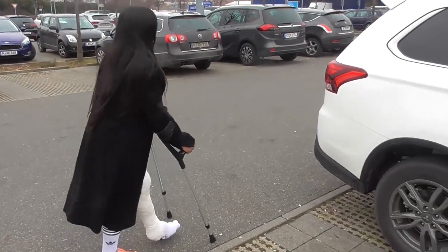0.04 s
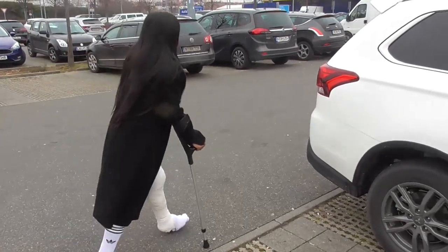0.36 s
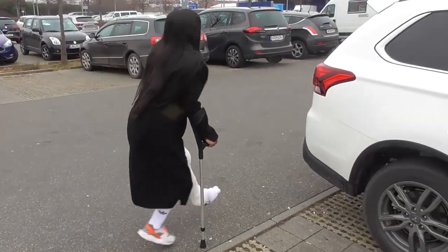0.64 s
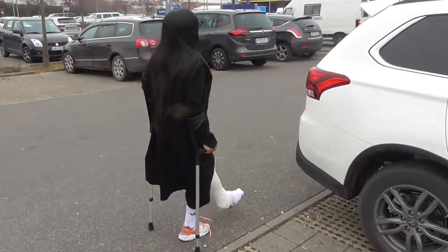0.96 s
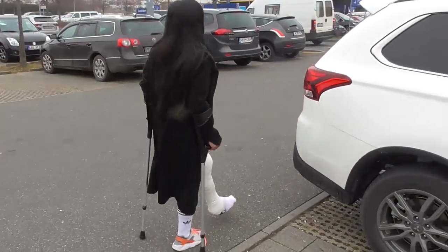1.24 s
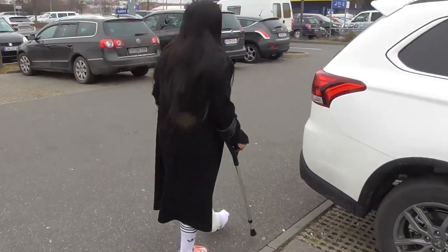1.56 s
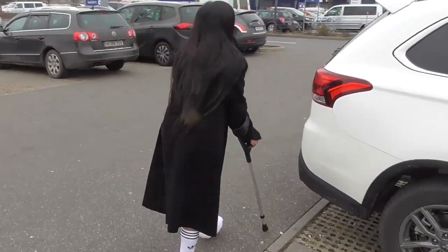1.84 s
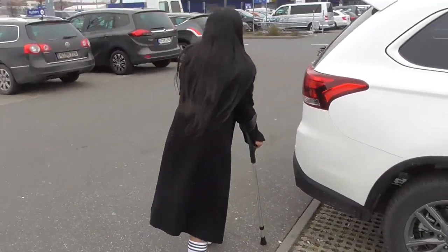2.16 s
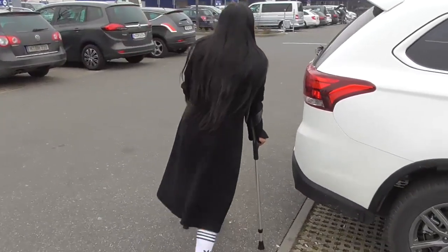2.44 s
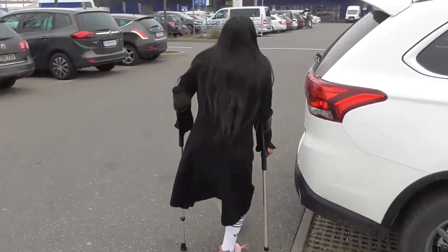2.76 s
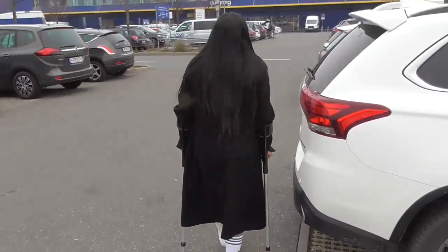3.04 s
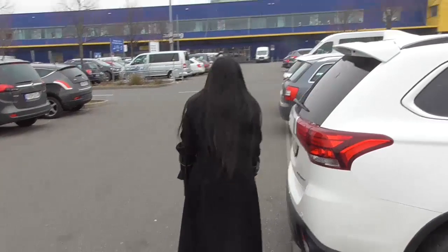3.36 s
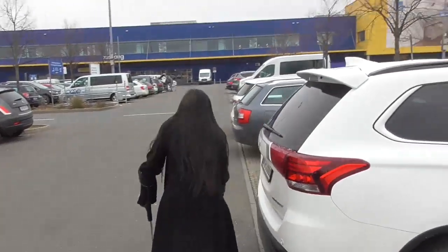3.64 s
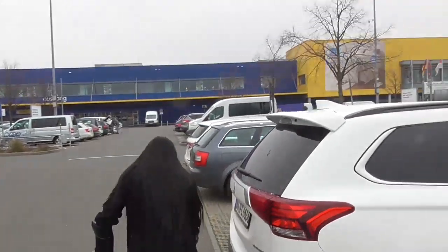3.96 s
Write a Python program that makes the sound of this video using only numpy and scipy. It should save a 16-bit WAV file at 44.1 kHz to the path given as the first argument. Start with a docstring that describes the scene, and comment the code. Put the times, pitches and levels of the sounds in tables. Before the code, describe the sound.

Crutches clack and tap on asphalt with single footsteps, over distant traffic and wind gusts.

```python
"""An open asphalt car park: someone on crutches crosses close to the microphone.
A crutch tube clacks and rings, tips and joints tick, rubber tips thud, a coat swishes.
The one shoe lands with a heel slap, a forefoot clap and a crunch of grit.
Distant traffic rumbles, an engine idles, and in the second half wind buffets the microphone."""
import sys
import numpy as np
from scipy import signal
from scipy.fft import rfft, irfft
from scipy.io import wavfile
from scipy.ndimage import uniform_filter1d

SR = 44100
rng = np.random.default_rng(int(sys.argv[2]) if len(sys.argv) > 2 else 0)


def wav_out(sig):
    """Save sig, one row per channel (or a flat mono array), as 16-bit PCM at SR to the path in sys.argv[1]."""
    wavfile.write(sys.argv[1], SR, np.round(np.clip(np.atleast_2d(sig).T, -1, 1) * 32767).astype(np.int16))


N = 176400

# Hiss spectrum of grit and coat. Each row: frequency in Hz, relative level in dB.
HISS_SPECTRUM = [(1000, -16), (3500, -7.5), (5600, -7), (7300, 0.5), (9000, 1.5), (11500, 2), (13500, -7.5),
                 (16000, -17)]


def undb(db):
    """Decibels to gain."""
    return 10 ** (np.asarray(db) / 20)


def unit(x):
    """Scale to rms 1."""
    return x / np.sqrt(np.mean(x ** 2))


def envelope(t, points):
    """Gain over time from (s, dB) points."""
    return undb(np.interp(t, *np.array(points).T))


def gains(points):
    """Gain per FFT bin from (Hz, dB) points."""
    hz, db = np.array(points, float).T
    bin_hz = np.arange(N // 2 + 1) * SR / N
    return undb(np.interp(np.log(bin_hz + 1), np.log(hz), db))


def colour(x, points):
    """Minimum-phase filter through (Hz, dB) points; keeps the power of white noise."""
    cepstrum = irfft(np.log(unit(gains(points))), N)
    cepstrum[1:N // 2] *= 2
    cepstrum[N // 2 + 1:] = 0
    impulse = irfft(np.exp(rfft(cepstrum)), N)[:N // 20]
    return signal.fftconvolve(x, impulse)[:N]


def band(x, hz, width_hz):
    """One resonance."""
    return signal.lfilter(*signal.iirpeak(hz, hz / width_hz, fs=SR), x)


def noise():
    """White noise."""
    return rng.standard_normal(N)


def wander(rate_hz):
    """Smooth random curve, rms 1."""
    hold = int(SR / rate_hz)
    stairs = np.repeat(noise()[:N // hold + 1], hold)
    return unit(uniform_filter1d(uniform_filter1d(stairs, hold), hold)[:N])


def fade(age_s, decay_s):
    """Sudden start, exponential decay."""
    return (age_s >= 0) * np.exp(-np.maximum(age_s, 0) / decay_s)


def fade_t60(age_s, t60_s):
    """Sudden start, 60 dB down after t60_s."""
    return fade(age_s, t60_s / np.log(1000))


def blow(start_s, modes, pitch_ratio=1, contact_s=0.0003):
    """One impact rings damped (Hz, dB, T60 s) modes at random phases."""
    out, first = np.zeros(N), int(start_s * SR)
    age_s = np.arange(min(SR // 4, N - first)) / SR
    ring = 0
    for hz, db, t60_s in modes:
        phase = 2 * np.pi * (hz * pitch_ratio * age_s + rng.random())
        ring += undb(db) * fade_t60(age_s, t60_s) * np.sin(phase)
    out[first:first + len(age_s)] = ring * (1 - np.exp(-age_s / contact_s))
    return out


def traffic(t):
    """Far roads rumble and swell, in stereo."""
    # Each row: frequency in Hz, relative level in dB.
    spectrum = [(25, -21.5), (45, -6), (65, 4.5), (90, -5), (140, -4), (260, -1.5), (380, -9), (500, -12),
                (750, -10), (1200, -16.5), (1700, -27), (2500, -35.5), (5500, -39), (9500, -38),
                (12500, -40), (16000, -51.5)]
    # Each row: frequency in Hz, side-to-mid ratio in dB.
    width = [(60, -8), (110, -14.5), (200, -27), (380, -9), (700, -9.5), (1290, -5.5), (2380, -4.5),
             (4400, -4.5), (8120, -2.5), (15000, -2)]
    # Each row: time in seconds, level in dB.
    levels = [(0, -42), (.4, -41.5), (1.1, -43), (1.9, -43), (2.5, -42.5), (4, -41.5)]
    mid, side = (colour(noise(), spectrum) * undb(0.39 * wander(6.17)) for _ in range(2))
    side = irfft(rfft(side) * gains(width), N)
    return np.array([mid + side, mid - side]) * envelope(t, levels)


def idling_engine(hz=64.66, wobble_hz=1.83, level_db=-52):
    """An engine idles: one low tone, unsteady in pitch and level."""
    phase = 2 * np.pi * np.cumsum(hz + wobble_hz * wander(9.08)) / SR
    return undb(level_db) * unit(np.sin(phase) * undb(2 * wander(5.16)))


def far_car(t, hz=238.5, width_hz=89):
    """A far car hums in a narrow band of noise."""
    # Each row: time in seconds, level in dB.
    levels = [(0, -57), (.38, -42), (.7, -49), (1.4, -54), (1.8, -52), (2.5, -57), (4, -65)]
    hum = band(band(noise(), hz, width_hz), hz, 2 * width_hz)
    return unit(hum) * envelope(t, levels)


def shimmer(t, flicker_db=5, drift_ratio=0.015, fade_s=0.13):
    """Faint, thin bands of high hiss flicker and drift in pitch."""
    # Each row: centre in Hz, width in Hz, level in dB, start and end in seconds.
    hiss_bands = [(11320, 620, -69.5, 0.13, 2.34), (7300, 300, -70.5, .18, 0.47),
                  (4670, 500, -73.5, 0.083, 0.69)]
    out = 0
    for hz, width_hz, db, start_s, end_s in hiss_bands:
        gate = np.clip(np.minimum(t - start_s, end_s - t) / fade_s + 0.5, 0, 1)
        level = undb(db + flicker_db * wander(70)) * gate
        phase = 2 * np.pi * np.cumsum(hz * (1 + drift_ratio * wander(30))) / SR
        hiss = [wander(2 * width_hz) * np.sin(phase) + wander(2 * width_hz) * np.cos(phase)
                for _ in range(2)]
        out += level * np.array(hiss)
    return out


def tube_clacks(t, ring_db=-0.5, crack_db=1):
    """The telescopic crutch tube takes up its play in quick knocks and rings."""
    # Each row: start in seconds, level in dB.
    knocks = [(.6487, -29), (.6512, -24.5), (0.6525, -26.5)]
    # Each row: frequency in Hz, relative level in dB, T60 in seconds.
    tube_modes = [(7220, -18, 0.15), (7330, -22, 0.17), (7400, -20.5, 0.15), (7530, 5, 0.016),
                  (8040, 1.5, 0.018), (8400, -2, 0.012), (8900, -10, 0.0099)]
    # Each row: frequency in Hz, relative level in dB.
    crack_spectrum = [(700, -29), (1600, -5), (2300, -5), (3000, -5.5), (4200, 4), (5800, -8), (8000, 4.5),
                      (12500, -3), (16000, -30)]
    ring = sum(undb(db + ring_db) * blow(start_s, tube_modes) for start_s, db in knocks)
    crack = sum(undb(db + crack_db) * fade(t - start_s, decay_s=0.001) for start_s, db in knocks)
    return ring + colour(crack * np.sign(noise()), crack_spectrum)


def grains(rate_per_s=7000, spread_db=2.5):
    """Dense tiny fractures of uneven size."""
    impulses = (rng.random(N) < rate_per_s / SR) * np.sign(noise())
    size_db = spread_db * np.minimum(rng.exponential(size=N), 4)
    return unit(impulses * undb(size_db))


def footsteps(t, touch_db=-5.5, lift_db=-7, release_db_per_s=900):
    """The heel slaps down; the sole grinds grit as the pressure rises and eases."""
    # Each row: start, time to full pressure and time to end of slide in seconds,
    # slap level in dB, slap pitch in Hz, crunch level in dB, grit hiss level in dB.
    landings = [(0.8449, 0.02, 0.032, -23, 464, -35.5, -36), (2.8007, 0.0047, 0.02, -14.5, 750, -25, -31),
                (3.874, 0.031, 0.031, -28, 620, -29.5, -38)]
    # Each row: multiple of the slap pitch, relative level in dB, T60 in seconds.
    heel_modes = [(.55, -10.5, 0.032), (1., 0.5, 0.014), (1.45, -4.5, 0.017), (2.2, -12, .018)]
    # Each row: frequency in Hz, relative level in dB.
    crunch_spectrum = [(150, -17), (350, -1.5), (700, 12), (1400, 4.5), (2300, -3), (3400, -1), (4300, -6),
                       (8000, -3), (16000, -52)]
    slaps, crunch, grit = 0, 0, 0
    for start_s, rise_s, slide_s, slap_db, slap_hz, crunch_db, grit_db in landings:
        age_s = t - start_s
        for multiple, db, t60_s in heel_modes:
            tone = np.sin(2 * np.pi * slap_hz * multiple * age_s)
            slaps += undb(slap_db + db) * fade_t60(age_s, t60_s) * tone
        pressure_db = np.interp(age_s, [0, rise_s, slide_s], [touch_db, 0, lift_db])
        release_db = release_db_per_s * np.maximum(age_s - slide_s, 0)
        pressure = (age_s >= 0) * undb(pressure_db - release_db)
        crunch += undb(crunch_db) * pressure
        grit += undb(grit_db) * pressure
    return slaps + colour(crunch * grains(), crunch_spectrum) + colour(grit * grains(), HISS_SPECTRUM)


def ticks(t):
    """Crutch tips, joints and small stones make contact: a dull knock plus a bright snap."""
    # Each row: start in seconds, knock level in dB, snap level in dB, decay in seconds.
    contacts = [(.861, -37, -40, 0.00091), (.8752, -40, -31, .0007), (1.0172, -68, -37.5, 0.0008),
                (2.052, -56, -57, 0.0037), (2.167, -37.5, -43.5, 0.0016), (2.653, -53, -46.5, 0.0035),
                (2.766, -55, -42, 0.0022), (2.8118, -29, -20.5, .0009), (2.822, -43, -24, .001),
                (2.892, -64, -43, .001), (2.9965, -54, -37.5, 0.0012), (3.297, -42, -53, 0.0036),
                (3.343, -47.5, -55, .002), (3.426, -43.5, -62, .003), (3.477, -35, -35.5, 0.0037),
                (3.490, -40, -53, 0.0036), (3.503, -45, -53, 0.0029), (3.591, -35.5, -41, 0.0031),
                (3.667, -43.5, -67, .002), (3.8959, -26, -29, .001), (3.9186, -45, -29, 0.0019)]
    # Each row of both: frequency in Hz, relative level in dB.
    knock_spectrum = [(250, -45), (800, 9), (1500, 3), (2300, 7), (3300, -2), (4500, 1.5), (8000, -27),
                      (16000, -40)]
    snap_spectrum = [(2000, -25), (5500, -7.5), (7700, 8.5), (9500, 3), (12000, 2.5), (14000, -5),
                     (16000, -24)]
    knock = sum(undb(db) * fade(t - start_s, decay_s) for start_s, db, _, decay_s in contacts)
    snap = sum(undb(db) * fade(t - start_s, decay_s) for start_s, _, db, decay_s in contacts)
    return (colour(knock * np.sign(noise()), knock_spectrum)
            + colour(snap * np.sign(noise()), snap_spectrum))


def forefoot_claps():
    """The hollow shoe rings as the forefoot lands after the heel."""
    # Each row: start in seconds, level in dB, pitch ratio.
    claps = [(.8752, -31.5, 0.57), (2.8113, -11, 0.99), (2.8205, -23, 1.), (3.8841, -23.5, .62),
             (3.8966, -19, 0.75)]
    # Each row: base frequency in Hz, relative level in dB, T60 in seconds.
    shoe_modes = [(900, -21, .04), (1410, -10.5, 0.017), (1670, -11.5, 0.014), (2034, -8, .018),
                  (2610, -4.5, .013), (3210, -6.5, 0.016), (3400, -5.5, 0.017), (3800, -16, 0.013),
                  (5300, -10, 0.0088)]
    return sum(undb(db) * blow(start_s, shoe_modes, ratio) for start_s, db, ratio in claps)


def tip_thuds():
    """Rubber tips hit the asphalt and ring dull modes of tip and shaft."""
    # Each row: start in seconds, level in dB.
    thuds = [(2.167, -43), (3.298, -38.5), (3.478, -33.5), (3.490, -40), (3.504, -40), (3.5909, -38),
             (3.668, -37.5)]
    # Each row: base frequency in Hz, relative level in dB, T60 in seconds.
    tip_modes = [(860, 1, 0.036), (960, -0.5, 0.038), (1330, 0.5, .03), (2090, -2.5, 0.018),
                 (2340, -10, 0.013)]
    return sum(undb(db) * blow(start_s, tip_modes, pitch_ratio=0.98) for start_s, db in thuds)


def wind(t, crossover_hz=282):
    """Wind thumps on the microphone; the two sides move now together, now against each other."""
    # Each row: time in seconds, left and right level in dB, likeness of the sides from -1 to 1.
    gusts = [(2.45, -55.5, -46.5, -0.58), (2.575, -36, -34, -0.84), (2.61, -22, -16.5, -0.94),
             (2.65, -25, -23, -0.88), (2.688, -19, -14, -0.98), (2.77, -28, -26.5, -0.37),
             (2.85, -51, -36.5, -.3), (3.04, -46, -45, -0.62), (3.16, -35, -25.5, -0.43),
             (3.24, -40, -20, -0.29), (3.28, -19.5, -30, .2), (3.32, -43, -29.5, -0.2),
             (3.48, -40.5, -33.5, -0.24), (3.54, -24.5, -28, 0.23), (3.63, -24, -19.5, 0.66),
             (3.70, -25.5, -27, 0.63), (3.78, -19.5, -23, 0.9), (3.83, -26.5, -28.5, 0.81),
             (3.90, -27, -35.5, 0.94), (3.93, -17, -17, 0.88), (4.0, -26.5, -28.5, 0.98)]
    # In-phase and opposed buffeting. Each row: frequency in Hz, relative level in dB.
    mid_spectrum = [(25, -34.5), (55, -17), (85, -4.5), (120, 0), (160, -1), (250, -7.5), (400, -19.5),
                    (700, -30.5), (1300, -37.5), (2500, -69), (8000, -79)]
    side_spectrum = [(25, -22), (55, -13), (85, -1.5), (120, -1), (160, -1.5), (250, -9), (400, -22),
                     (700, -28), (1300, -55), (2500, -70), (8000, -72)]
    # Each row: time in seconds, gain above the crossover in dB.
    flutter_levels = [(2.7, -1), (3.22, -6.5), (3.55, 1.5), (3.78, -2.5), (3.95, 2.5)]
    times_s, *columns = np.array(gusts).T
    left_db, right_db, likeness = (np.interp(t, times_s, column) for column in columns)
    eddies = colour(noise(), mid_spectrum), colour(noise(), side_spectrum)
    mid, side = (x / np.sqrt(uniform_filter1d(x ** 2, size=2400)) for x in eddies)  # running rms 1
    mid *= np.sqrt((1 + likeness) / 2)
    side *= np.sqrt((1 - likeness) / 2)
    ports = np.array([(mid + side) * undb(left_db), (mid - side) * undb(right_db)])
    thumps = signal.sosfiltfilt(signal.butter(2, crossover_hz, fs=SR, output="sos"), ports)
    flutter = ports - thumps
    return thumps + flutter * envelope(t, flutter_levels)


def coat_swishes(t):
    """The long coat brushes against the legs."""
    # Each row: peak time in seconds, Gaussian sigma in seconds, level in dB.
    swishes = [(2.646, 0.034, -60.5), (2.755, 0.03, -55.5), (3.778, 0.012, -55)]
    level = sum(undb(db) * np.exp(-0.5 * ((t - peak_s) / sigma_s) ** 2)
                for peak_s, sigma_s, db in swishes)
    return colour(noise(), HISS_SPECTRUM) * level


def car_park(t, mid, spread, echo_db=-18, t60_s=0.26, gap_s=0.008):
    """Near sounds sit in the middle, wider in bass and treble; parked cars scatter a short tail."""
    # Each row: frequency in Hz, side-to-mid ratio in dB.
    width = [(200, -4), (1000, -29), (3000, -13.5), (8000, -9), (15000, -5)]
    side = irfft(1j * rfft(spread) * gains(width), N)  # 90 degree shift
    tail = fade_t60(t - gap_s, t60_s)
    impulses = [unit(tail * noise()) / np.sqrt(N) for _ in range(2)]
    echo = np.array([signal.fftconvolve(mid, impulse)[:N] for impulse in impulses])
    return np.array([mid + side, mid - side]) + undb(echo_db) * echo


def scene():
    """Walker, background and wind; gritty sounds reach the two ports a little differently."""
    t = np.arange(N) / SR
    rings = tube_clacks(t) + forefoot_claps() + tip_thuds()
    mid, spread = (rings + footsteps(t) + ticks(t) + coat_swishes(t) for _ in range(2))
    walker = car_park(t, mid, spread)
    background = traffic(t) + idling_engine() + far_car(t) + shimmer(t)
    return walker + background + wind(t)


def record(dry, cutoff_hz=15450):
    """A steep low-pass cuts the top treble."""
    return signal.sosfilt(signal.ellip(8, 0.2, 70, cutoff_hz, fs=SR, output="sos"), dry)


dry = scene()
out = record(dry)
wav_out(out)
```